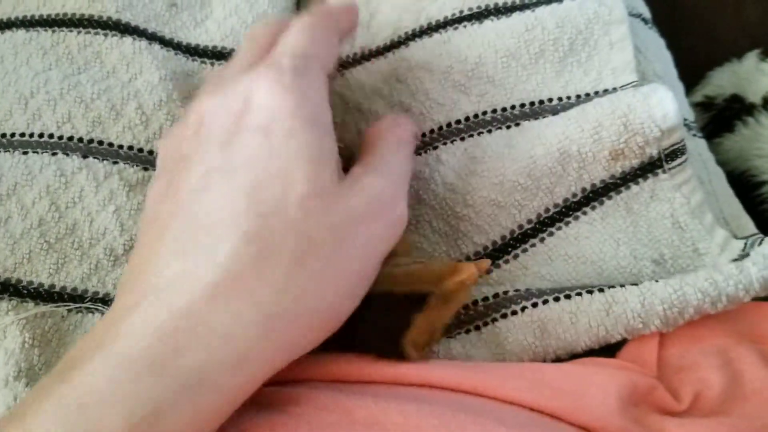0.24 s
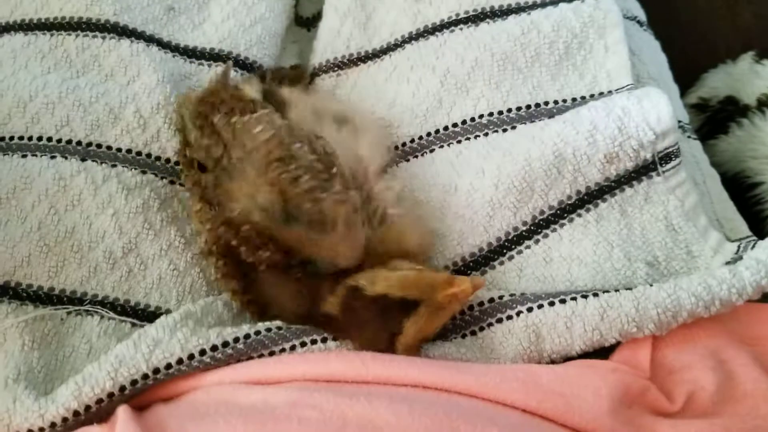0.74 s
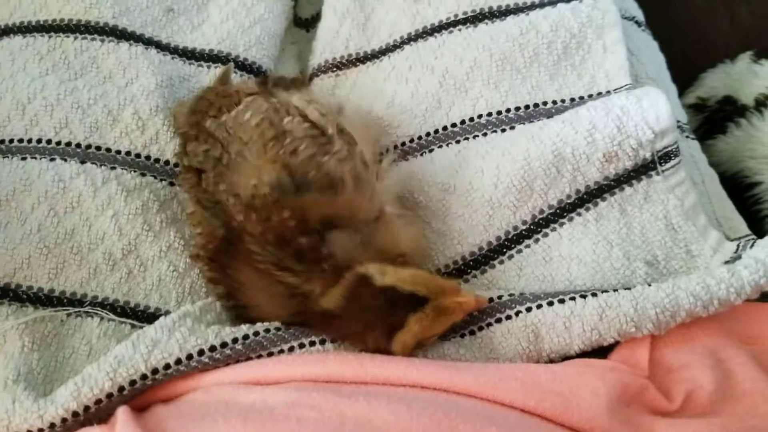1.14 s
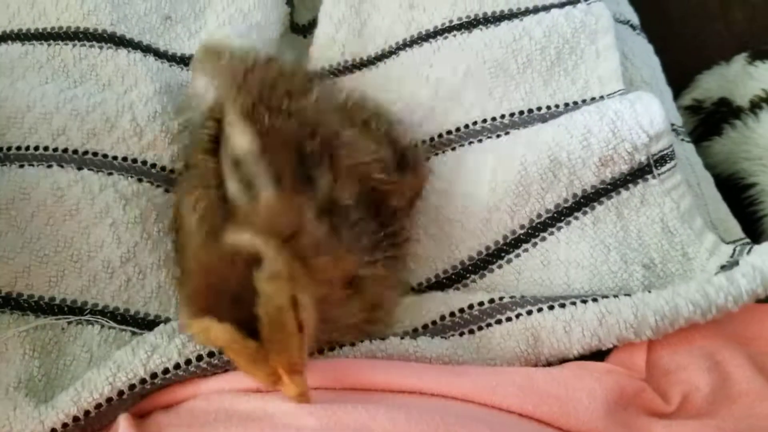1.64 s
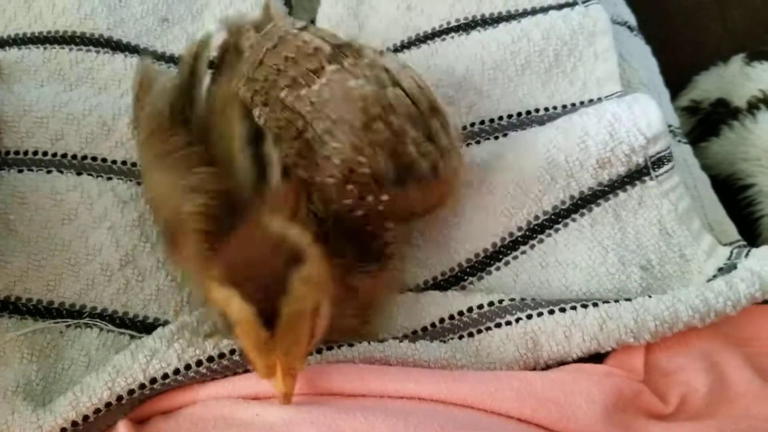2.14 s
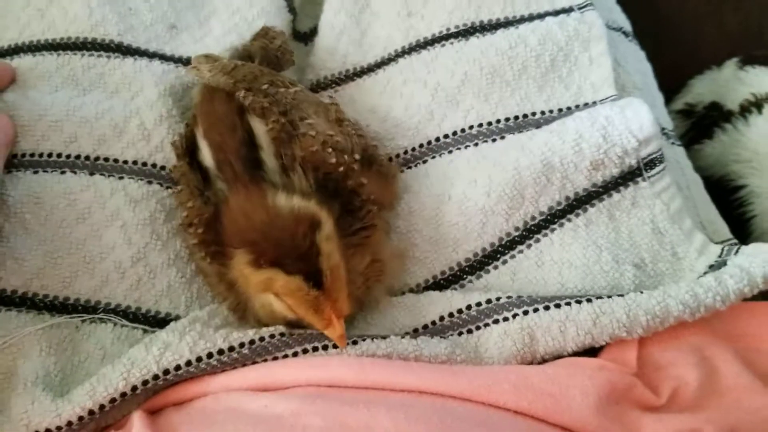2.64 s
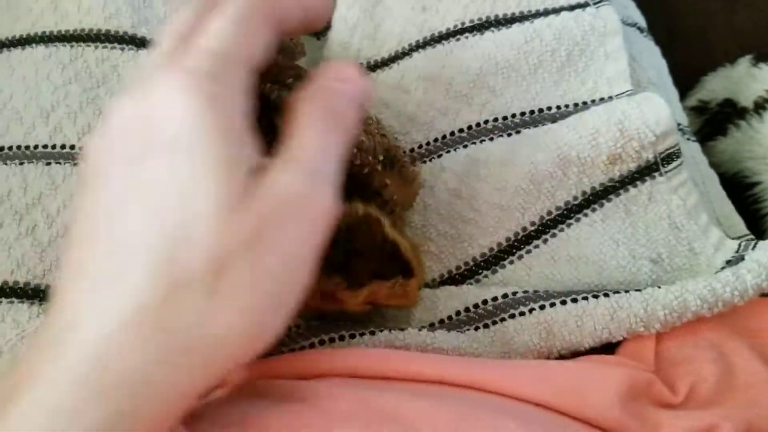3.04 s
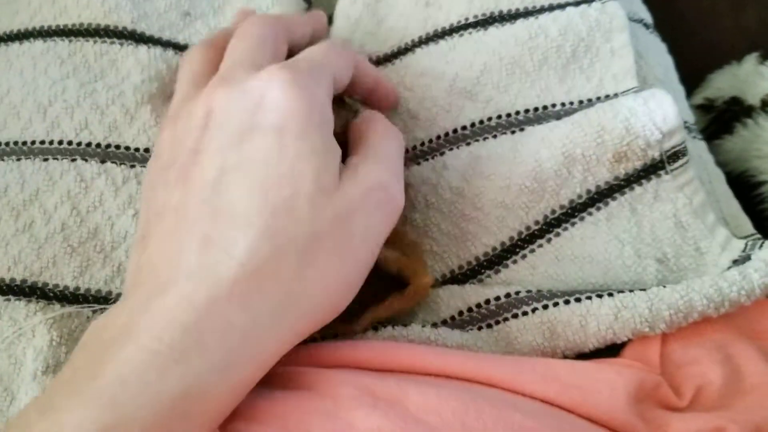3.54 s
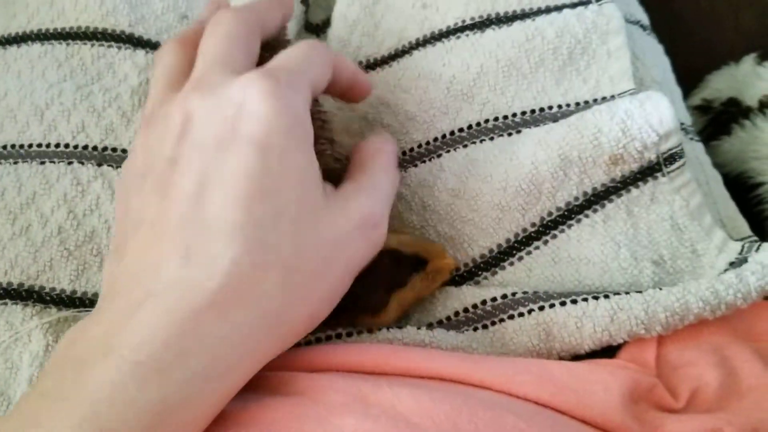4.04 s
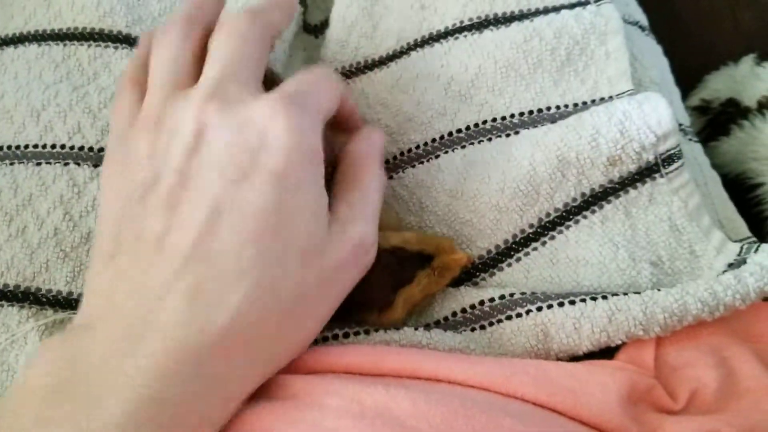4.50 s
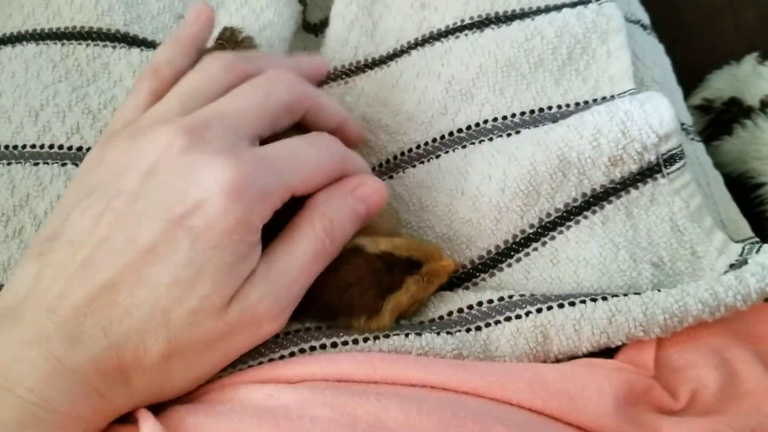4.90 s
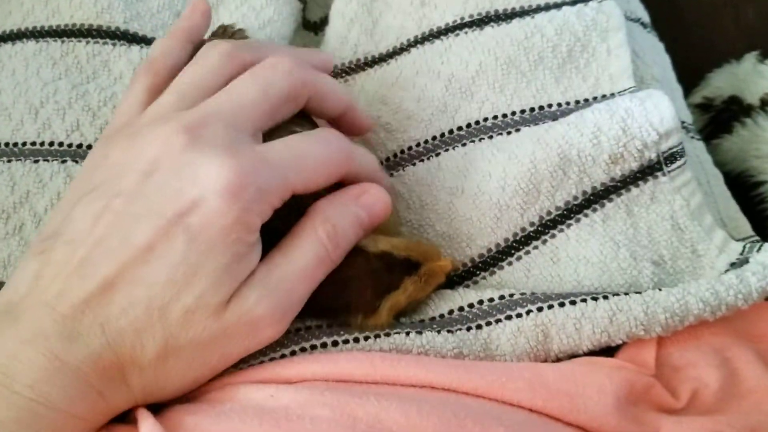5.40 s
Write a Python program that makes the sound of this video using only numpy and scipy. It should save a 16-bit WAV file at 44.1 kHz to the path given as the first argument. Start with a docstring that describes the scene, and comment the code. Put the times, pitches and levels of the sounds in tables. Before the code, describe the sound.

In a quiet room, a young chick close to a stereo microphone peeps, slightly to the right. A hand slides off, the chick drops with a soft thud, snags the towel with dry claw snaps and beats its wings in a quick regular flutter. It then settles, the hand slides back and strokes its down faintly, while short rising peeps and tiny cheeps continue over a low appliance hum.

```python
"""A young chick's peeps lead: gliding tones with beak-shaped overtones, and soft high cheeps in between.
It lies on a towel in a quiet room, close to the right microphone port; sines make its voice.
Let go, it scratches and flaps to right itself: a thud, bursts of shaped noise and dry snaps.
A hand slides over the towel and strokes the feathers, as grainy friction noise.
An appliance hums in the room: wavering sines, low-pitched noise and faint hiss."""
import sys
import numpy as np
from scipy import signal
from scipy.fft import rfft, irfft, next_fast_len
from scipy.io import wavfile
from scipy.ndimage import map_coordinates

SR = 44100
rng = np.random.default_rng(int(sys.argv[2]) if len(sys.argv) > 2 else 0)


def materialize(psi):
    """Save the field psi as 16-bit PCM at rate SR to the path in sys.argv[1].

    A 1-D psi becomes a single channel; in a 2-D psi each row is a channel.
    """
    bounded = np.clip(np.atleast_2d(psi).T, -1, 1)
    quanta = np.round(bounded * 32767).astype(np.int16)
    wavfile.write(sys.argv[1], SR, quanta)


N = 249606  # samples

# Spectrum of touched down and feather tips. Each row: frequency in Hz, relative level in dB.
DOWN_SPECTRUM = [(1500, -19), (4500, -8), (7600, -11), (9200, -2.5), (12000, -10), (15500, -11)]


def amp(db):
    """Decibels to gain."""
    return 10 ** (np.asarray(db) / 20)


def unit(x):
    """Scale to rms 1."""
    return x / np.sqrt(np.mean(x ** 2) + 1e-20)


def clock():
    """Time of every sample in seconds."""
    return np.arange(N) / SR


def along(points, hz):
    """Interpolate (Hz, value) points on a log frequency axis."""
    point_hz, value = np.transpose(points)
    return np.interp(np.log(hz + 1), np.log(point_hz + 1), value)


def bells(rows, power=2.5):
    """Sum of round-topped gain swells from (centre s, half length s, dB) rows."""
    total = np.zeros(N)
    for centre_s, half_s, db in rows:
        distance = np.minimum(np.abs(clock() - centre_s) / half_s, 10)
        total += amp(db) * np.exp(-.5 * distance ** power)
    return total


def held(rows, attack_s, release_s):
    """Sum of gains from (start s, length s, dB) rows; attack and release are seconds per 20 dB."""
    t = clock()
    total = np.zeros(N)
    for start_s, length_s, db in rows:
        before = np.maximum(start_s - t, 0) / attack_s
        after = np.maximum(t - start_s - length_s, 0) / release_s
        total += amp(db - 20 * (before + after))
    return total


def wobble(rate_hz):
    """Smooth random curve with rate_hz knots a second."""
    knots = rng.standard_normal(int(N * rate_hz / SR) + 4)
    return map_coordinates(knots, [clock() * rate_hz])


def filtered(x, response):
    """Multiply the spectrum of x by response(hz)."""
    m = next_fast_len(N + 8192)  # padding limits wrap-around
    hz = np.fft.rfftfreq(m, 1 / SR)
    return irfft(rfft(x, m) * response(hz), m)[..., :N]


def coloured(x, spectrum):
    """Shape x by a (Hz, dB) spectrum, at rms 1."""
    return unit(filtered(x, lambda hz: amp(along(spectrum, hz))))


def ports(pair, right_db, lead_s):
    """Two-port level difference, right against left; sound reaches the left port lead_s earlier."""
    gain = amp([[-right_db / 2], [right_db / 2]])
    sign = np.array([[1], [-1]])
    return gain * filtered(pair, lambda hz: np.exp(1j * np.pi * hz * lead_s * sign))


def rustle(spectrum, grain_db, alike, right_db, clump_db=0.14):
    """Stereo friction noise: fibres slip in tiny bursts of uneven size that come in clumps."""
    shared = np.sqrt(alike) * rng.standard_normal(N)
    separate = np.sqrt(1 - alike) * rng.standard_normal((2, N))
    bursts = amp(grain_db * wobble(1500) + clump_db * wobble(110))
    return ports(coloured((shared + separate) * bursts, spectrum), right_db, lead_s=.00011)


def peep_shape(length_s, settled_hz, sag_hz, flick_hz, crest_s, db, crescendo_db, release_s):
    """Pitch and gain of one peep: it sags to its settled pitch, and flicks up or down near its end."""
    attack_s = 0.0083
    turn_s = .025  # the sag bottoms out this long before the crest
    t = np.arange(int(length_s * SR)) / SR
    sag = np.maximum(1 - t / max(crest_s - turn_s, attack_s), 0) ** 2
    half_s = .009 * np.sqrt((abs(flick_hz) + 1) / 428)  # larger flicks take longer
    flick = np.exp(-.5 * ((t - crest_s) / half_s) ** 2)
    hz = settled_hz + sag_hz * sag + flick_hz * flick
    edges = np.minimum(t / attack_s, 1) * np.minimum((length_s - t) / release_s, 1)
    swell_db = crescendo_db * np.minimum(t / (length_s - release_s) - 1, 0)
    return hz, edges * amp(db + swell_db)


def peeps(bright_db=16):
    """The syrinx gives a gliding, nearly pure tone; the open beak favours overtones near 5, 8 and 11 kHz."""
    # Each row: start in seconds, length in seconds, pitch in Hz after the sag and before the flick,
    # opening sag in Hz, closing flick in Hz, flick crest in seconds after the start,
    # level in dB before the ports, crescendo in dB, release in seconds, overtone offset in dB.
    peep_rows = [ (.003, 0.056, 2547, 430, 0, 0.07, -33.5, 6, .02, 1),
                 (.409, .073, 2685, 180, 354, 0.071, -32, 3.5, 0.0062, 5.5),
                 (.575, .035, 2984, 60, -300, .035, -34, 14, 0.016, -4),
                 (2.885, .057, 2340, 58, 430.5, 0.049, -28.5, 22.5, .012, -0.5),
                 (3.608, 0.06, 2333, 94, 234, .049, -30.5, 14, 0.013, -3),
                 (3.787, .048, 2312, 150, 197, 0.038, -28.5, 6, 0.014, -0.5),
                 (4.443, 0.067, 2320, 110, 572, 0.06, -28, 9, 0.017, 2),
                 (4.667, .029, 2412, 17, -54, 0.021, -30, -1, .017, 5.5),
                 (5.377, 0.066, 2185, 180, 583, 0.053, -28.5, 17.5, .026, 0), ]
    # Beak resonances. Each row: frequency in Hz, overtone level in dB before the offsets.
    beak = [(4400, -31), (4950, -22), (5600, -27.5), (7100, -43.5), (8200, -37.5), (9400, -42),
            (11000, -37.5), (16000, -43)]
    # Instants where the voice catches. Each row: centre in seconds, depth in dB.
    catches = [(2.905, 14), (3.621, 12), (3.638, 15.5), (5.391, 14), (5.411, 15)]
    catch_half_s = 0.0016

    hz = np.full(N, float(peep_rows[0][2]))
    gain, open_db = np.zeros(N), np.zeros(N)
    for start_s, *shape, overtone_db in peep_rows:
        pitch_hz, envelope = peep_shape(*shape)
        span = int(start_s * SR) + np.arange(len(pitch_hz))
        hz[span], gain[span], open_db[span] = pitch_hz, envelope, overtone_db
    hz = hz * (1 + .002 * wobble(500))
    roughness_db = .4 * wobble(500)  # slight random roughness of the tone's level
    catch_db = sum(db * np.exp(-.5 * ((clock() - s) / catch_half_s) ** 2) for s, db in catches)
    phase = 2 * np.pi * np.cumsum(hz) / SR

    # a slacker membrane sings lower and purer: partial k loses k * bright_db per octave below 2680 Hz
    slack_db = bright_db * np.minimum(np.log2(hz / 2680), 0)
    tone = np.sin(phase)
    for k in range(2, 6):
        partial_db = along(beak, k * hz) + open_db + k * slack_db + 1.6 * wobble(150)
        tone += amp(partial_db) * np.sin(k * phase)
    # in one peep the voice cracks: tones halfway between the partials
    crack = bells([(2.925, 0.0023, -56)]) * (np.sin(phase / 2) + np.sin(1.5 * phase))
    return np.sqrt(2) * (gain * amp(roughness_db - catch_db) * tone + crack)


def cheeps():
    """With the beak shut, each soft cheep closes in on its pitch and holds it with a slight quaver."""
    # Each row: start in seconds, length in seconds, pitch in Hz, scoop in Hz, level in dB before the ports.
    cheep_rows = [(0.522, 0.041, 3160, 300, -55.5), (1.442, 0.047, 3115, 0, -53.5),
                  (1.72, 0.052, 3287, 500, -58), (2.527, 0.045, 3190, 548, -59.5),
                  (2.744, 0.053, 3380, 100, -64.5), (3.293, 0.04, 3156, 97, -53),
                  (3.504, 0.048, 3474, 651, -56.5), (3.772, 0.028, 3390, 0, -68.5),
                  (4.279, .055, 3306, 250, -58.5), (4.531, 0.063, 3410, 450, -60)]
    scoop_s = 0.0066
    out = np.zeros(N)
    quaver = 1 + 0.017 * wobble(300)
    for start_s, length_s, hz, scoop_hz, db in cheep_rows:
        t = np.arange(int(length_s * SR)) / SR
        span = slice(int(start_s * SR), int(start_s * SR) + len(t))
        glide_hz = (hz - scoop_hz * np.exp(-t / scoop_s)) * quaver[span]
        envelope = np.sqrt(2 * np.abs(np.sin(np.pi * t / length_s)))
        out[span] += amp(db) * envelope * np.sin(2 * np.pi * np.cumsum(glide_hz) / SR)
    return out


def room(x, early_db=3, early_t60_s=0.055):
    """Nearby surfaces answer quickly; a diffuse tail follows at each port, treble dying first."""
    # Each row: frequency in Hz, reverberation time (60 dB) in seconds.
    ring = [(3000, .29), (10000, .2)]
    hz, t, z = signal.stft(rng.standard_normal((2, SR // 2)), SR, nperseg=256)
    late = amp(-60 * t / along(ring, hz)[:, None])
    early = amp(early_db - 60 * t / early_t60_s)
    tail = signal.istft(z * (late + early), SR, nperseg=256)[1]
    tail = tail / np.linalg.norm(tail[0])
    delayed = np.pad(x, (200, 0))  # samples
    return signal.fftconvolve(delayed[None], tail, axes=1)[:, :N]


def voice():
    """The beak points at the right port and the left is shaded; the room adds its reflections."""
    # Notes near 3 kHz reach the ports more by way of the room. Each row: frequency in Hz, level in dB.
    echo = [(2300, -20), (2800, -20.5), (3300, 1), (4500, -18)]
    call = peeps() + cheeps()
    reflected = room(filtered(call, lambda hz: amp(along(echo, hz))))
    return amp(-4.5) * ports(call, right_db=12.5, lead_s=.00004) + reflected


def claws(snap_db=-4):
    """Claws catch threads; each snagged thread lets go with a dry snap."""
    # Each row: start in seconds, level in dB before snap_db and the ports.
    snags = [(0.5619, -37), (0.5751, -37.5), (0.6035, -36.5), (0.7315, -37), (0.8704, -44.5), (0.8852, -39),
             (0.9027, -38), (1.036, -43), (1.2386, -45), (1.5314, -41), (2.1538, -40)]
    # Each row: frequency in Hz, relative level in dB.
    snap_spectrum = [(600, -37), (1500, 7), (5000, 4.5), (8000, -7), (11000, -12), (12600, 15.5),
                     (15000, -22)]
    t60_s = .008
    t, gain = clock(), np.zeros(N)
    for start_s, db in snags:
        decay = amp(-60 * np.clip(t - start_s, 0, .1) / t60_s)
        gain += amp(db + snap_db) * (t >= start_s) * decay
    return gain * rustle(snap_spectrum, grain_db=0, alike=.7, right_db=10, clump_db=0)


def struggle():
    """The chick drops onto the towel, ruffles its plumage and beats its wings, stirring fibre noise."""
    # Wing beats on the towel. Each row: centre in seconds, half length in seconds, level in dB before the ports.
    flaps = [(0.557, 0.013, -59), (0.594, .0065, -54), (0.744, 0.0045, -55), (0.892, 0.02, -60.5),
             (1.057, 0.033, -63), (1.252, 0.012, -50.5), (1.396, 0.012, -50.5), (1.543, .013, -47),
             (1.687, .013, -49.5), (1.836, 0.017, -51), (1.993, 0.014, -48.5), (2.16, 0.012, -52)]
    # Swishes of feather tips. Each row: centre in seconds, half length in seconds, level in dB before the ports.
    swishes = [(1.068, 0.0077, -56.5), (1.778, 0.0057, -57.5), (2.224, 0.0051, -55.5), (2.83, 0.016, -65.5)]
    # Bouts that ruffle the plumage. Each row: start in seconds, length in seconds, level in dB before the ports.
    bouts = [(.45, 0.69, -69.5), (1.24, .97, -59.5)]
    # Wing and plumage spectra. Each row: frequency in Hz, relative level in dB.
    wing_spectrum = [(250, -33), (550, 2), (1300, 4), (2300, 0.5), (4000, -5.5), (8000, -19.5),
                     (15000, -21)]
    plumage_spectrum = [(400, -7), (900, 2), (5000, -1.5), (7000, -5), (12500, -1), (15500, -5)]

    thud = bells([(.534, 0.01, -45)]) * np.sin(2 * np.pi * 80 * clock())
    bump_spectrum = [(50, 2), (150, 0), (450, 2), (1200, -36)]  # (Hz, dB)
    bump = bells([(.534, 0.013, -46)]) * coloured(rng.standard_normal(N), bump_spectrum)

    # the wing scuffs again as it folds back
    recoveries = [(s + 0.053, half_s, db - 12.5) for s, half_s, db in flaps]
    beats = bells(flaps) + bells(recoveries)
    wings = beats * rustle(wing_spectrum, grain_db=5.0, alike=0.97, right_db=4.0, clump_db=-1.0)

    # every beat stirs the plumage too
    stirred = bells([(s, .035, db - 9) for s, _, db in flaps])
    ruffle = np.hypot(held(bouts, attack_s=0.13, release_s=0.14), stirred)
    plumage = ruffle * rustle(plumage_spectrum, grain_db=1.5, alike=0.1, right_db=3.5, clump_db=2.5)
    tips = bells(swishes) * rustle(DOWN_SPECTRUM, grain_db=2.5, alike=.25, right_db=6)
    return thud + bump + wings + plumage + tips + claws()


def hand(uneven_db=1.0):
    """The palm slides on the towel and the fingers brush the down with uneven pressure."""
    # Palm slides. Each row: start in seconds, length in seconds, level in dB before the ports.
    slides = [(0, .37, -65), (2.9, 0.17, -63), (4.47, 0.17, -60.5)]
    # Fingers resting on the down and rubbing. Each row: start in seconds, length in seconds,
    # level in dB before the unevenness and ports.
    rubs = [(0, 0.22, -72), (2.85, 2.72, -79)]
    # Finger strokes. Each row: centre in seconds, level in dB before the ports.
    strokes = [(3.4, -72.5), (3.64, -75), (3.88, -70), (4.07, -64.5), (4.225, -66), (4.39, -67.5),
               (4.6, -70.5), (4.77, -74), (4.94, -71.5), (5.1, -75.5)]
    # Each row: frequency in Hz, relative level in dB.
    towel_spectrum = [(900, -10), (2700, 7), (5100, 1.5), (6500, -8.5), (12000, -17), (15500, -11.5)]
    attack_s, release_s = 0.051, .2  # per 20 dB

    towel = rustle(towel_spectrum, grain_db=1.5, alike=0.3, right_db=7.0)
    slide = held(slides, attack_s, release_s) * towel
    rub = held(rubs, attack_s, release_s) * amp(uneven_db * wobble(12))
    stroke = bells([(s, .037, db) for s, db in strokes])
    down = rustle(DOWN_SPECTRUM, grain_db=2.3, alike=0.12, right_db=10)
    return slide + np.hypot(rub, stroke) * down


def background(air_db=-54.5):
    """An appliance's wavering hum and low rush of air, with faint microphone hiss."""
    # Air and hiss spectra. Each row: frequency in Hz, relative level in dB.
    air_spectrum = [(20, -48.5), (38, -8.5), (55, -1.5), (72, -11), (92, -0.5), (116, -7), (160, 0.5),
                    (215, -2), (255, -4.5), (335, -4.5), (430, -8), (550, -11.5), (720, -20.5), (1000, -30),
                    (2000, -56)]
    hiss_spectrum = [(600, -30), (1400, 0), (2500, -7), (8000, -13), (12500, -9), (14200, -9), (15500, -3),
                     (16200, -30)]
    # Likeness of the air at the two ports. Each row: frequency in Hz, correlation.
    air_alike = [(100, 0.97), (400, 0.78), (1000, 0.59)]
    # Hum tones. Each row: frequency in Hz, rms level in dB before the waver and ports.
    hum_tones = [(57, -75), (89.7, -64.5), (209, -66), (332, -65), (424, -67)]

    def mid_side(hz):
        angle = np.arccos(np.clip(along(air_alike, hz), -1, 1)) / 2
        return np.array([np.cos(angle), np.sin(angle)])

    mid, side = filtered(coloured(rng.standard_normal((2, N)), air_spectrum), mid_side)
    air = amp(air_db) * np.array([mid + side, mid - side])
    hum = np.zeros(N)
    for hz, db in hum_tones:
        level = np.sqrt(2) * amp(db + 0.95 * wobble(5.8))
        hum += level * np.sin(2 * np.pi * hz * clock() + 1.11 * wobble(5))
    hiss = amp(-72.5) * coloured(rng.standard_normal((2, N)), hiss_spectrum)
    return ports(air + hum, right_db=-1, lead_s=.0001) + hiss


def scene():
    """Everything at the two ports."""
    return voice() + struggle() + hand() + background()


def record(dry):
    """The recorder keeps nothing from its band limit up."""
    top_hz = 15900
    return filtered(dry, lambda hz: hz < top_hz)


dry = scene()
out = record(dry)
materialize(out)
```